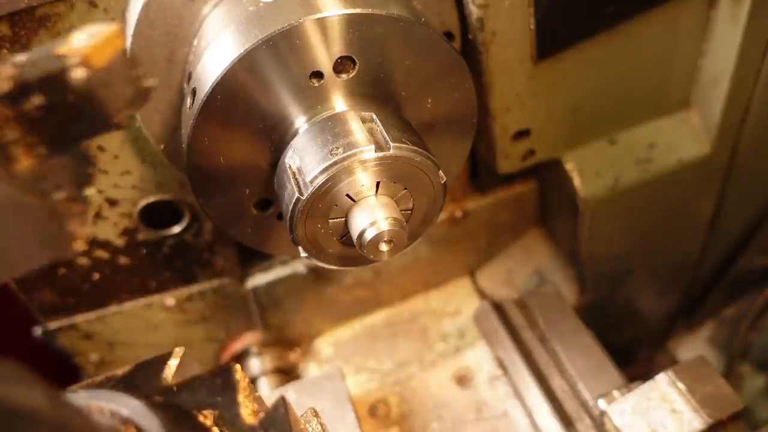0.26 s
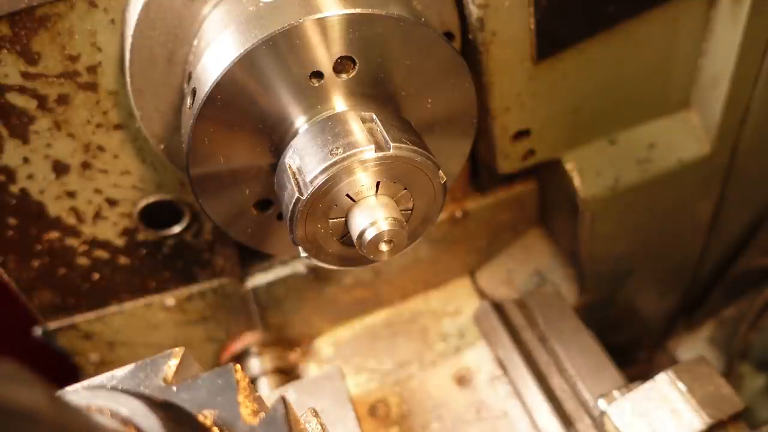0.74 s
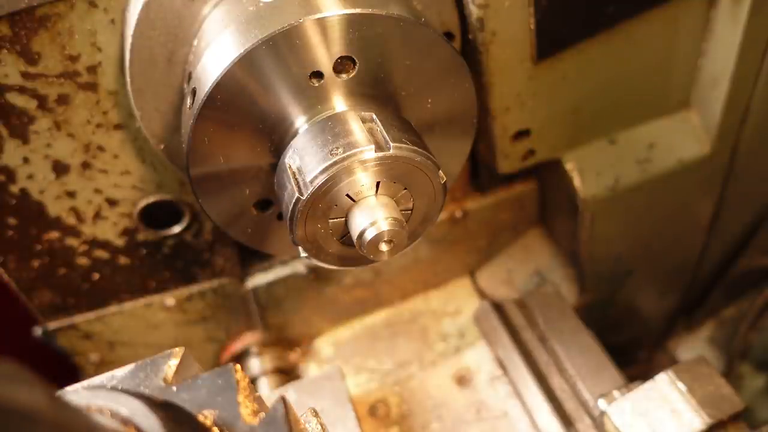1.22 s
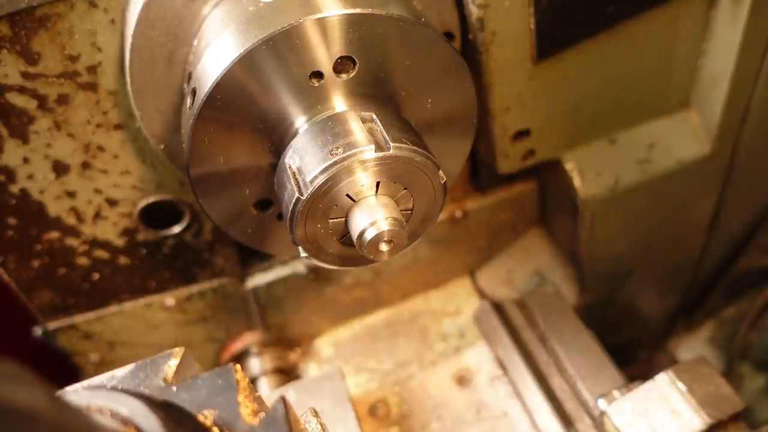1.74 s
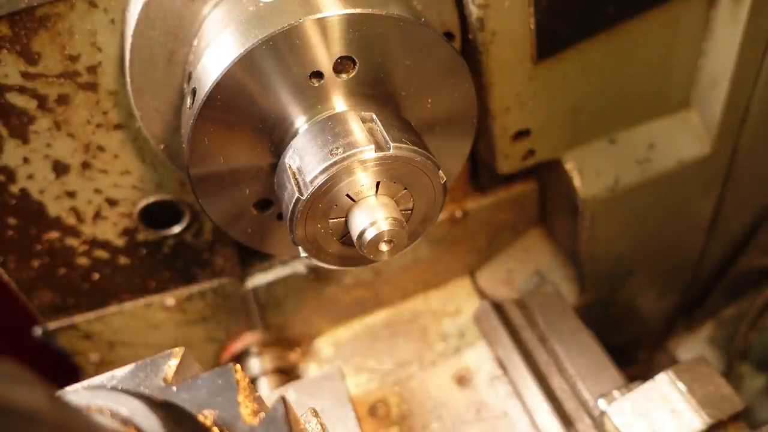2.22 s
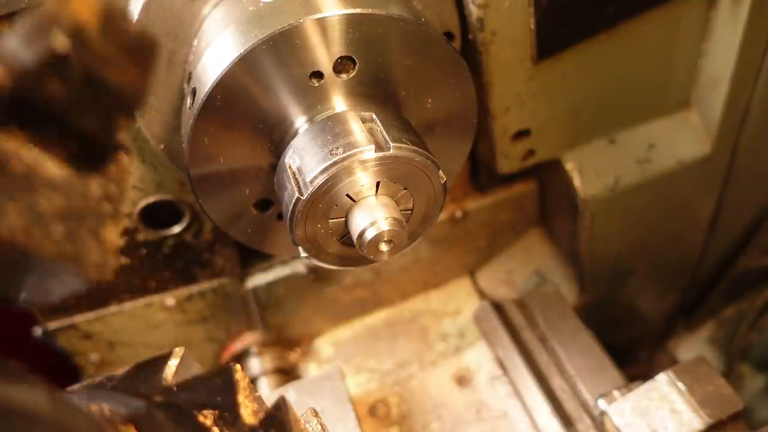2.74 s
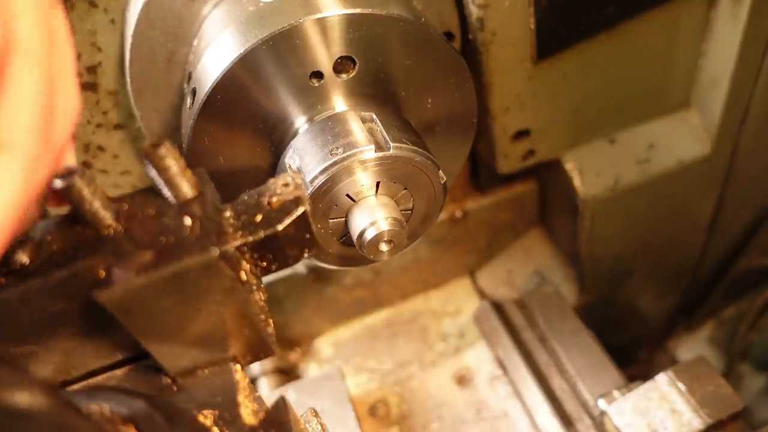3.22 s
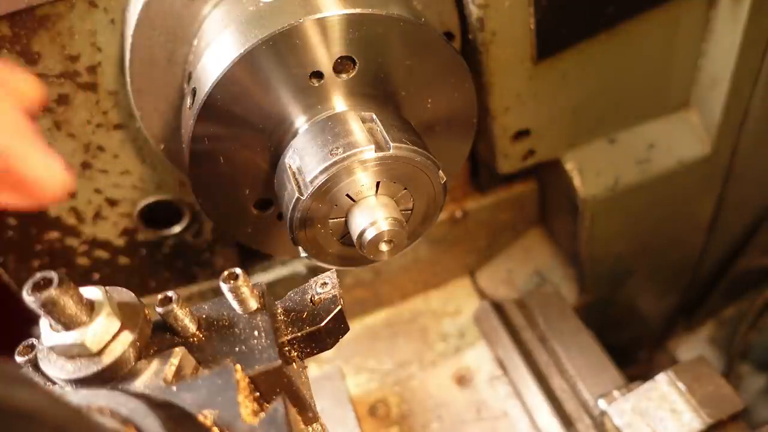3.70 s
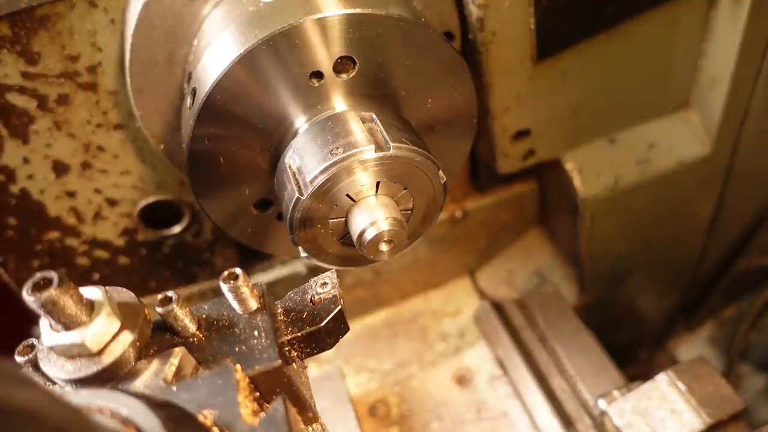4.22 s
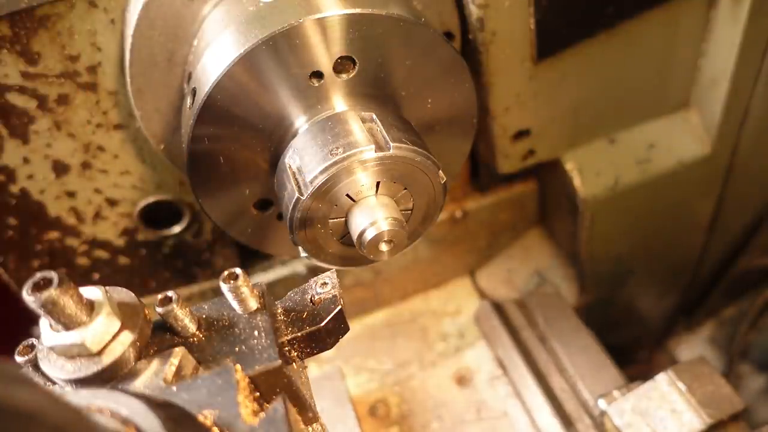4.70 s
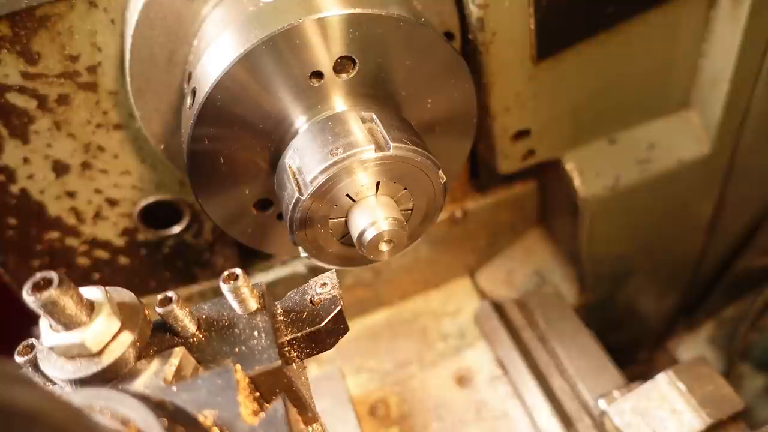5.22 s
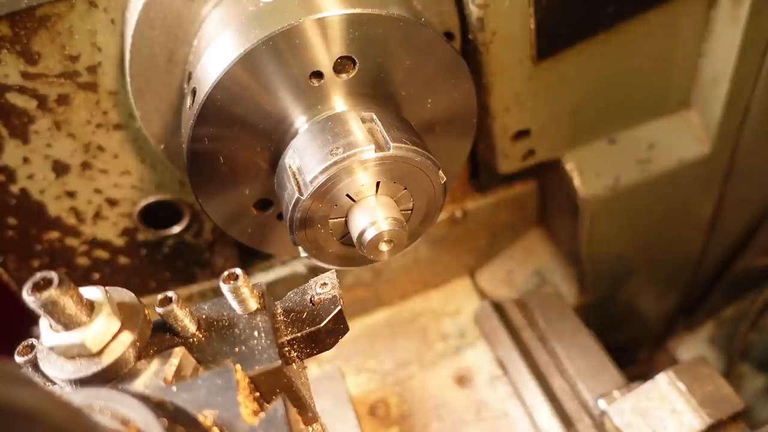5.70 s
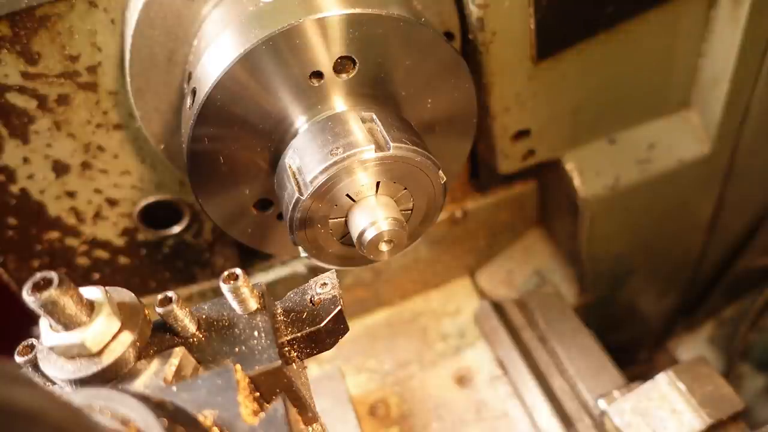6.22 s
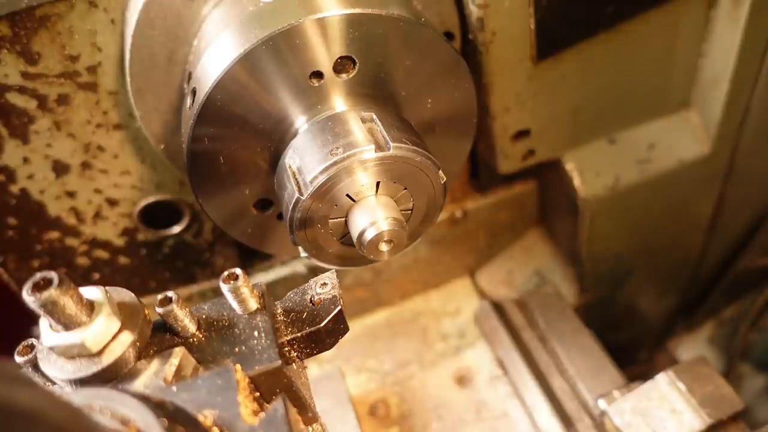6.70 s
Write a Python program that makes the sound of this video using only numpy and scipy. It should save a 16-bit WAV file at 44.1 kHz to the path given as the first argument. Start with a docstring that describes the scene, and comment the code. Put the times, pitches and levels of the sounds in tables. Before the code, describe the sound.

A metal tool holder slides off, is put down with knocks, another clinks and slides into place, a lever clicks, and steel clatters last.

```python
"""A scrape of steel is heard first: a tool holder slides off its post on a lathe that stands still.
It is put down with two knocks; the next one clinks, slides down the dovetail and lands on its stop.
The lever turns and clicks tight, and more steel clatters at the end, over faint air, whirr and hum.
Blows are coloured pulses and friction is a train of tiny slips; both excite decaying modes and
a diffuse reverberant tail in a small workshop."""
import sys
import numpy as np
from scipy import signal
from scipy.fft import irfft
from scipy.io import wavfile
from scipy.ndimage import uniform_filter1d

SR = 44100
rng = np.random.default_rng(int(sys.argv[2]) if len(sys.argv) > 2 else 0)


def log_audio(samples):
    """Write samples as a 16-bit WAV file to the path given in sys.argv[1]."""
    # one column per channel
    frames = np.atleast_2d(samples).T
    # limit to full scale, then quantise
    limited = np.clip(frames, -1, 1)
    pcm = np.round(limited * 32767).astype(np.int16)
    wavfile.write(sys.argv[1], SR, pcm)


N = 306495
HZ = np.fft.rfftfreq(4096, 1 / SR)  # frequency axis of the blow and friction spectra


def amp(db):
    """Level to amplitude: 20 dB is a factor of ten."""
    return 10 ** (np.asarray(db) / 20)


def evened(x):
    """Normalization to unit rms, the root of mean power."""
    return x / np.sqrt(np.mean(x ** 2) + 1e-20)


def read(points, hz):
    """Spectral interpolation, linear on a logarithmic frequency axis."""
    f, value = np.transpose(points)
    return np.interp(np.log(hz + 1), np.log(f + 1), value)


def humps(resonances, hz):
    """Resonance: each one lifts a bell-shaped band of the spectrum, in dB."""
    return sum(db * np.exp(-((hz - f) / width) ** 2) for f, width, db in resonances)


def wander(count, size):
    """Random fluctuation: twice-smoothed noise of rms 1."""
    once = uniform_filter1d(rng.standard_normal(count), size)
    return evened(uniform_filter1d(once, size))


def add(mix, s, sound):
    """Superposition: a sound is summed into the mix at time s."""
    part = mix[..., max(round(s * SR), 0):][..., :sound.shape[-1]]
    part += sound[..., :part.shape[-1]]


# Spectrum of the still air: f/Hz, relative level/dB
AIR_COLOUR = [(18, -59), (30, -30), (38, -37), (168, -7), (202, -1.5), (230, -8.5), (292, -4), (332, -10),
              (874, -11.5), (1550, -16), (2020, -12.5), (2300, -17.5), (2550, -20), (3490, -21.5),
              (15500, -29)]
AIR_DB = -58.02  # rms level re full scale
# Resonances of the faint background whirr: f/Hz, width/Hz, lift/dB
WHIRR = [(856, 55, 2.5), (1140, 34, 6), (2020, 49, 5), (2630, 83, 4)]
# Left-right likeness of the air and whirr: f/Hz, correlation (no unit)
LIKENESS = [(60, 0.314), (180, 0.39), (550, 0.54), (1650, 0.48), (4970, 0.61), (15000, 0.8)]
# Components of the mains hum: f/Hz, rms level/dB
HUM = [(200, -69), (250, -85), (300, -75), (500, -77)]


def room_tone(waver_db=2.0):
    """Partly correlated noise shaped as air and wavering whirr, plus steady sinusoids of mains hum."""
    hz, frames, (left, other) = signal.stft(rng.standard_normal((2, N)), SR, nperseg=2048)
    same = np.clip(read(LIKENESS, hz), -1, 1)[:, None]
    right = same * left + np.sqrt(1 - same ** 2) * other
    whirr = humps(WHIRR, hz)[:, None]
    waver = waver_db * wander(len(frames), size=9) * whirr / whirr.max()
    z = np.array([left, right]) * amp(read(AIR_COLOUR, hz)[:, None] + whirr + waver)
    air = evened(signal.istft(z, SR, nperseg=2048)[1][:, :N])
    t = np.arange(N) / SR
    hum = sum(amp(db) * np.sqrt(2) * np.sin(2 * np.pi * (f * t + rng.random())) for f, db in HUM)
    return amp(AIR_DB) * air + hum


# Reverberation of the workshop, before each sound's own room level: f/Hz, relative level/dB
ROOM_GAIN = [(60, 10), (120, 14.5), (250, 12.5), (600, 13), (1400, 3.5), (2800, -1.5), (6000, 0),
             (14000, -4.5)]
# Decay time of the workshop, to -60 dB: f/Hz, t60/s
ROOM_T60 = [(60, 1.5), (130, 0.76), (250, 0.75), (600, 0.48), (1400, 0.44), (2800, 0.35), (6000, 0.31),
            (14000, 0.26)]


def workshop(x, build_s=0.0021, apart_low=0.095, apart_high=0.36):
    """Diffuse decay: two close microphones receive nearly the same tail, most of all in the bass."""
    hz, t, z = signal.stft(rng.standard_normal((2, SR + SR // 4)), SR, nperseg=512)
    t60 = np.maximum(read(ROOM_T60, hz), .05)[:, None]
    decay = amp(read(ROOM_GAIN, hz)[:, None] - 60 * t / t60)
    z *= decay * np.sqrt(np.log(10 ** 6) / (t60 * SR))  # equal energy whatever the decay time
    z[1] *= read([(250, apart_low), (4000, apart_high)], hz)[:, None]
    mid, side = signal.istft(z, SR, nperseg=512)[1]
    build_up = 1 - np.exp(-np.arange(len(mid)) / SR / build_s)
    room = np.array([mid + side, mid - side]) * build_up
    return signal.fftconvolve(x[None], room, axes=1)


def pulse(colour_db):
    """Minimum phase: the sharpest causal pulse that has this spectrum."""
    log_gain = np.log(amp(np.r_[colour_db, colour_db[-2:0:-1]]))
    return np.fft.ifft(np.exp(np.conj(signal.hilbert(log_gain)))).real


def bend(x):
    """Dispersion: bending waves are slower at low pitch, so metal smears a click over a few ms."""
    delay_s = .0025 / np.sqrt(1 + HZ / 500)
    phase = 2 * np.pi * np.cumsum(delay_s - delay_s[-1]) * HZ[1]  # integral of the group delay
    smear = irfft(np.exp(-1j * phase))
    return signal.fftconvolve(x, smear[:len(smear) // 8])


RING_DB = -49  # reference strength of a mode against the blow, before the offsets of mode and source


def ring(modes):
    """Modal decay: damped sinusoids, with new random phases at every contact."""
    t = np.arange(SR * 3 // 4) / SR
    hz, db, t60 = np.transpose(modes)[:, :, None]
    envelope = amp(RING_DB + db - 60 * t / t60)
    return (envelope * np.sin(2 * np.pi * (hz * t + rng.random(hz.shape)))).sum(0)


def radiate(x, modes, room_db, ring_db, chatter=.12, chatter_s=0.0037, apart=0.15):
    """Radiation: a contact chatters for a few ms, rings the object and fills the room."""
    t = np.arange(SR // 40) / SR
    mid, side = chatter * rng.standard_normal((2, len(t))) * np.exp(-t / chatter_s)
    mid[0] = 1  # the contact itself, before its chatter
    near = np.array([mid + apart * side, mid - apart * side]) / np.linalg.norm(mid)
    out = amp(room_db) * workshop(x)
    add(out, 0, signal.fftconvolve(bend(x)[None], near, axes=1))
    add(out, 0, amp(room_db + ring_db) * signal.fftconvolve(x, ring(modes)))
    return out


CLACK_FADE = 0.11  # dB of clack lost per dB of force: a light touch pings, a hard blow excites everything


def blows(rows, colour, modes, ring_db, clack_db, clack_octaves, pan_db):
    """Impact: each blow is one pulse with a broad clack resonance and its own thud, body and treble."""
    out = np.zeros((2, N))
    for s, db, thud_db, body_db, pitch_hz, treble_db, room_db in rows:
        weight = [(250, thud_db), (700, body_db), (1400, 0.0057), (2500, 0.0042), (5000, treble_db)]
        octaves = np.log2((HZ + 1) / pitch_hz)
        clack = (clack_db - CLACK_FADE * db) * np.exp(-(octaves / clack_octaves) ** 2)
        # each point of contact favours its own set of the many high modes
        uneven_db = 2.5 * wander(len(HZ), size=9) * HZ / (HZ + 900)
        blow = pulse(db + read(colour, HZ) + read(weight, HZ) + clack + uneven_db)
        add(out, s, radiate(blow, modes, room_db, ring_db))
    return amp([[pan_db / 2], [-pan_db / 2]]) * out  # left over right


def stroke(length_s, swell_db, edge_s):
    """Applied force: the hand takes hold, bears down or eases off steadily in dB, and lets go."""
    t = np.arange(0, length_s, 1 / SR)
    grip = np.minimum(np.minimum(t, length_s - t) / edge_s, 1)
    return grip * amp(swell_db * (t / length_s - .5))


# Modes of the lathe's bed, slide and tool post: f/Hz, relative level/dB, t60/s
LATHE_MODES = [(229.6, 2, 0.7), (296.3, 8, 0.56), (401, 14, 0.16), (415.6, 13.5, 0.51), (564, -13.5, 0.88),
               (698.3, 8, 0.35), (758, 6.5, 0.35), (798, -5.5, 0.53), (837, 6.5, 0.37), (888, 9, 0.38),
               (979, 0, 0.58), (1277, 3.5, 0.2), (1268, 8.5, 0.32), (1450, -17, 0.14), (1650, -7, 0.22),
               (1933, 6.5, 0.11), (2004, -13, .55), (2255, 6.5, 0.051), (2460, 8, 0.17), (2664, -6, 0.35),
               (3280, 7.5, 0.21), (3430, -15, 0.52), (3680, 1, 0.42), (5980, -17, 0.24), (5770, -7, 0.32)]


def rub(strokes, colour_db, edge_s, slips_per_s, spread_db, room_db, ring_db):
    """Stick-slip friction: a random train of tiny slips of uneven size under each stroke."""
    out = np.zeros((2, N))
    for s, length_s, db, swell_db in strokes:
        force = amp(db) * stroke(length_s, swell_db, edge_s)
        size = amp(spread_db * np.minimum(rng.exponential(1, SR), 4)) * rng.choice([-1, 1], SR)
        train = size * (rng.random(SR) < slips_per_s / SR)
        slips = evened(train[:len(force)]) * force
        rubbing = signal.fftconvolve(slips, pulse(colour_db))
        add(out, s, radiate(rubbing, LATHE_MODES, room_db, ring_db))
    return out


# Faint high rustle around the tool post: start t/s, length/s, level/dB, swell/dB
RUSTLES = [(3.72, 0.85, -59.5, -17.5), (4.96, 0.28, -56.5, -17)]
# Spectrum of the rustle: f/Hz, relative level/dB
RUSTLE_COLOUR = [(100, -34), (1500, -5), (4000, -5), (7000, -9), (8200, -3.5), (10000, -5), (12500, -13),
                 (16000, -9)]


def rustle():
    """Fine friction: very dense slips merge into a soft, high noise."""
    return rub(RUSTLES, read(RUSTLE_COLOUR, HZ), edge_s=0.036, slips_per_s=8300, spread_db=3.0,
               room_db=3.0, ring_db=-13)


# Dull shuffling of things being moved: start t/s, length/s, level/dB, swell/dB
SHUFFLES = [(1.14, 0.123, -45, -0.5), (2.175, 0.032, -30, 7), (6.79, 0.12, -45.5, -8)]
# Spectrum of the shuffling: f/Hz, relative level/dB
SHUFFLE_COLOUR = [(40, -34), (110, -14), (230, 1.5), (450, -4), (1100, -8.5), (1600, -20), (4000, -24.5),
                  (16000, -41)]


def shuffle():
    """Dull friction: the slips carry most of their energy at low and middle frequencies."""
    return rub(SHUFFLES, read(SHUFFLE_COLOUR, HZ), edge_s=0.0098, slips_per_s=1500, spread_db=1.5,
               room_db=0, ring_db=-2)


# Holder put down on the bench: t/s, level/dB, thud/dB, body/dB, clack f/Hz, treble/dB, room/dB
KNOCKS = [(1.8968, 10.5, -2.5, -3, 1460, 3.5, -1), (1.9181, 9, 2, -0.5, 1390, -0.5, 0.5),
          (2.2026, 11.5, 1.5, -1, 1140, -2.5, -1.5)]
# Spectrum of a blow on the bench: f/Hz, relative level/dB
BENCH_COLOUR = [(30, -47), (60, -32), (100, -9), (250, -4), (600, -5), (1000, 2), (1700, -2), (3000, 0),
                (3500, -10), (4300, -10.5), (5200, -28), (6100, -21), (7200, -35), (16000, -52)]
# Modes of the bench and the holder on it: f/Hz, relative level/dB, t60/s
BENCH_MODES = [(123.7, 2, 0.66), (226.6, 7.5, 0.76), (425, 7.5, 0.62), (535, 7.5, 0.61), (788, 6, 0.3),
               (878, -3.5, 0.65), (922, 0.5, 0.48), (982, 1.5, 0.4), (1043, 3, 0.32), (1270, -12, 0.45),
               (2150, 2, 0.24), (2270, -9, 0.63), (2800, -18, 0.73), (2930, 1, 0.26), (3240, -14, 0.38),
               (5700, 0.5, 0.5)]


def bench():
    """Impact on a bench: the blows ring the modes of bench and holder, near the middle."""
    return blows(KNOCKS, BENCH_COLOUR, BENCH_MODES, ring_db=2, clack_db=4.5, clack_octaves=0.68, pan_db=-0.1)


# Lever turning on its thread: start t/s, length/s, friction level/dB, swell/dB
TURNS = [(4.93, .1, -53, 19)]
# Clamping lever locking: t/s, level/dB, thud/dB, body/dB, clack f/Hz, treble/dB, room/dB
LOCKS = [(5.0292, 6, 0.5, -3.5, 1740, -2.5, -5.5)]
# Spectrum of the lever: f/Hz, relative level/dB
LEVER_COLOUR = [(40, -50), (160, -5.5), (600, -6), (2100, 2), (2500, -9.5), (3200, 1.5), (3600, -7),
                (4600, -15), (5000, -10), (5400, -18), (6700, -20), (7800, -9.5), (8500, -25), (16000, -40)]


def lever():
    """Friction, then impact: the lever turns on its thread and locks with a dry click."""
    turn = rub(TURNS, read(LEVER_COLOUR, HZ), edge_s=0.0033, slips_per_s=2700, spread_db=4.0,
               room_db=1.5, ring_db=-4)
    lock = blows(LOCKS, LEVER_COLOUR, LATHE_MODES, ring_db=-2.5, clack_db=4.0, clack_octaves=0.25, pan_db=0.0)
    return turn + lock


# Steel sliding in the dovetail: start t/s, length/s, friction level/dB, swell over the stroke/dB
SLIDES = [(0, 0.11, -29.5, -1), (3.49, 0.124, -37.5, 22), (3.625, .063, -35.5, 6), (6.91, 0.036, -20.5, 31)]
# Resonances at which the sliding holder sings: f/Hz, width/Hz, lift/dB
SING = [(2230, 240, 7), (5730, 180, 5)]
# Spectrum of steel on steel, sliding or struck: f/Hz, relative level/dB
STEEL_COLOUR = [(30, -48), (80, -23), (150, -10.5), (300, -4), (550, -10.5), (1400, -3), (2400, -4),
                (3300, -9), (4400, -14), (5300, -17), (6000, -7.5), (6900, -21.5), (10000, -28),
                (12000, -36.5), (16000, -35)]


def dovetail(dull_db=-3.0):
    """Friction exciting resonance: the holder slips on its post and sings."""
    dulling = read([(2500, 0), (4500, dull_db)], HZ)
    colour_db = read(STEEL_COLOUR, HZ) + humps(SING, HZ) + dulling
    return rub(SLIDES, colour_db, edge_s=0.0029, slips_per_s=1600, spread_db=1.5, room_db=-5.0, ring_db=0)


# Steel meeting steel at the post: t/s, level/dB, thud/dB, body/dB, clack f/Hz, treble/dB, room/dB
CLINKS = [ (0.0745, -1.5, 3.5, 3, 2360, -16, -10.5), (1.5171, -22.5, -16, -18, 2250, -5, -6),
          (2.8781, 5, -2.5, 3.5, 930, -7.5, -8), (2.9339, 18.5, -10, -3.5, 2240, -13.5, -6),
          (2.9598, 17.5, -8, 7, 1850, -6.5, -4.5), (2.9846, 11.5, 3, 3, 1100, -3, -5.5),
          (2.9914, 17, -2, 10, 1930, -27, -4.5), (3.0794, 17.5, -3.5, -6.5, 2380, 6.5, 1),
          (3.2425, 6.5, -15, 8.5, 1650, -8.5, -4.5), (3.2634, 9, 14.5, -2, 2280, -7, -9.5),
          (3.5563, -10.5, 13, 6, 2240, -7, -3), (3.6231, -9, 9, 12.5, 2350, 6.5, 6),
          (3.6894, 13.5, 6.5, 10.5, 3030, 9, -4.5), (3.7065, 7.5, 10.5, 16, 710, 1, -2),
          (3.7088, 13, 7.5, -1, 2860, 0.5, -1), (4.2068, -28, -12, -16, 2510, 0, 8),
          (6.6742, -34.5, -6, -8, 4900, 12, 3), (6.9290, 0.5, 4.5, -4.5, 1900, 7, 9),
          (6.9462, 6, -3, 5, 1776, 9, 4)]


def tool_post():
    """Impact of steel on steel: the clinks ring the modes of the lathe, slightly to the right."""
    return blows(CLINKS, STEEL_COLOUR, LATHE_MODES, ring_db=-0.5, clack_db=10.0, clack_octaves=0.46,
                 pan_db=-0.5)


def scene():
    """Superposition of all sources, from the background to the tool post."""
    return room_tone() + rustle() + shuffle() + bench() + lever() + dovetail() + tool_post()


def record(dry, ceiling=0.97):
    """Saturation rounds off the loudest peaks; a linear-phase low-pass then limits the band."""
    rounded = ceiling * np.tanh(dry / ceiling)
    low_pass = signal.firwin(511, 15750, window=("kaiser", 9), fs=SR)  # cutoff in Hz
    return signal.oaconvolve(rounded, low_pass[None], "same")


dry = scene()
out = record(dry)
log_audio(out)
```